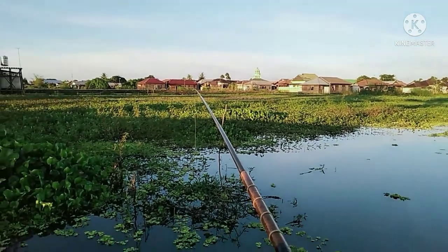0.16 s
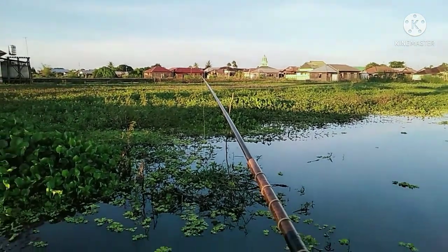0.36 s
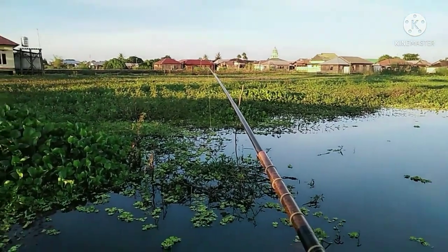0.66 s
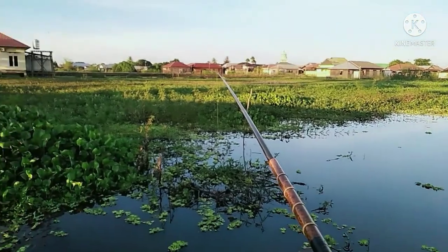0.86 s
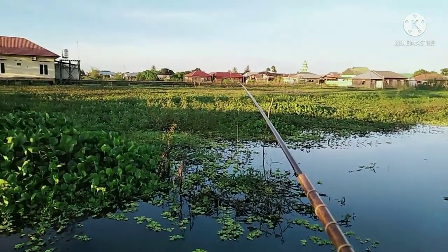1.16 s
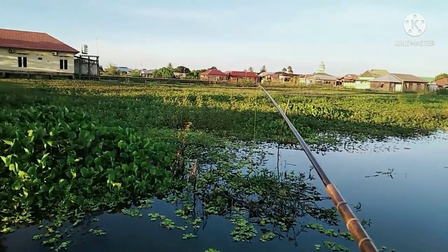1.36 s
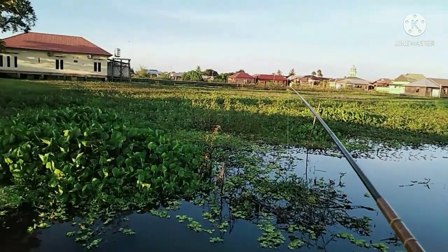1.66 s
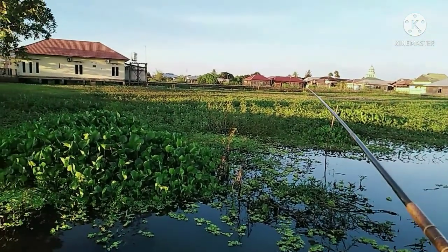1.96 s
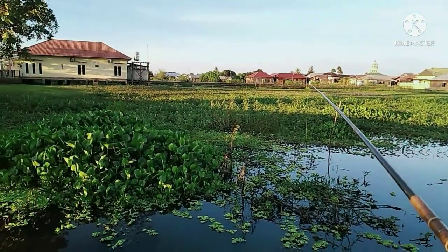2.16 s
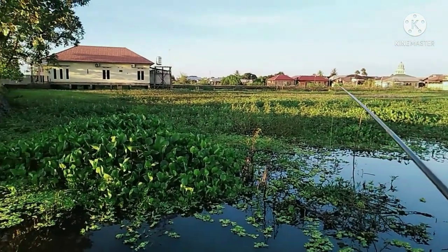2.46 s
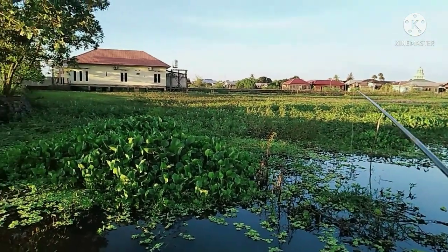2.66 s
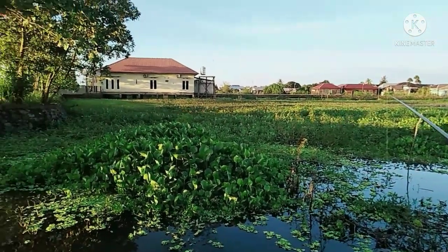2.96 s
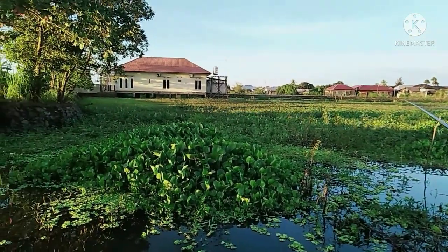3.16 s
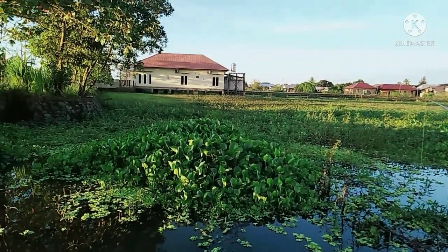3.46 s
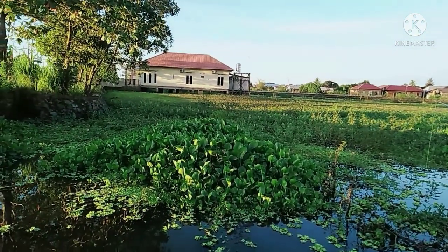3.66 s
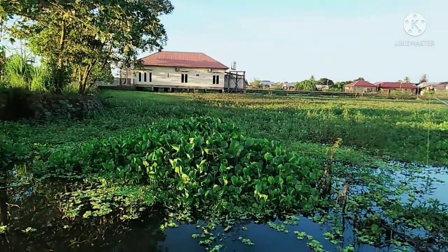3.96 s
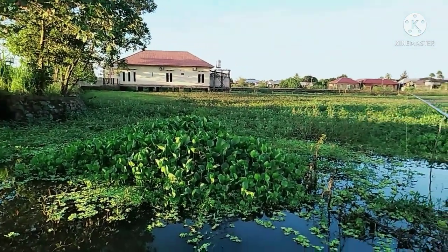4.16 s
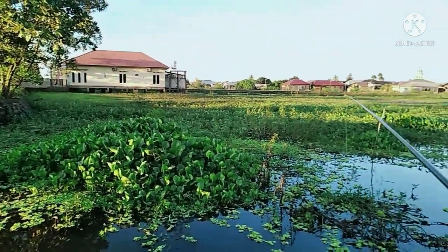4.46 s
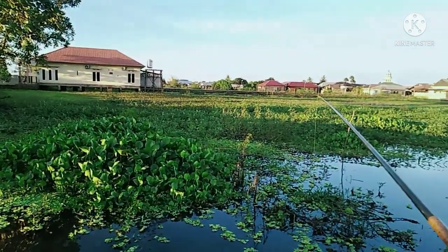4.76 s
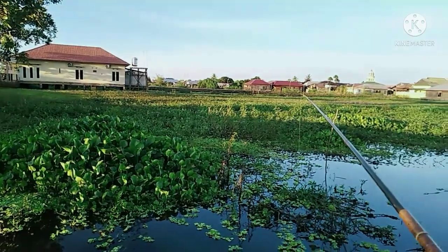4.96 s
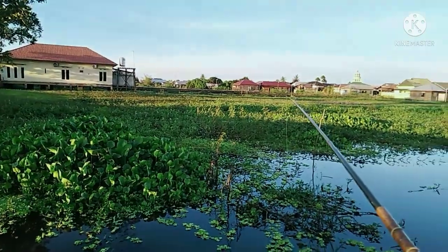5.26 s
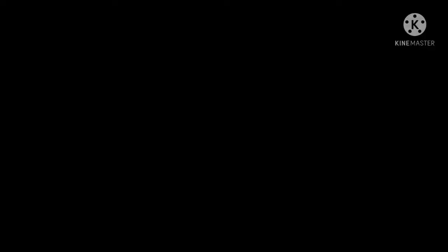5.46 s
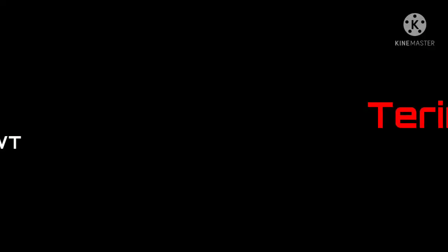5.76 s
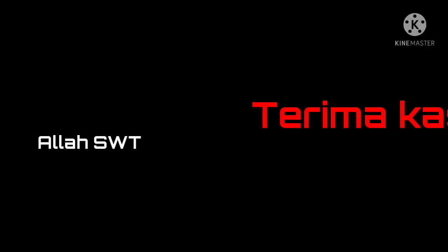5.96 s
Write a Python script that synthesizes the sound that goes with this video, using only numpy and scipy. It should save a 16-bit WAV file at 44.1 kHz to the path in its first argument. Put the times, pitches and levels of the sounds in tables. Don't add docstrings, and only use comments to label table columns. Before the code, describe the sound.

Open air beside a swampy pond, captured by a handheld microphone. From 0 s a four-cylinder vehicle is already loud: a low buzzing boom with a barking tail pipe and a brief airy fan whirr. It is muffled behind a house from about 0.1 to 0.6 s, then opens up brighter and strongest until about 1.9 s, its pitch gliding slowly upward and its tone fluttering with echoes. It dulls and recedes from 2 to 3.5 s, leaving a faint hum. Tiny frog or bird peeps appear around 1 s and cluster at 2.3 and 3 s. Cloth rubs softly near 3.1 s and more strongly at 3.3, 4.1 and 4.3 s. A slower, deeper engine blips at 3.8, 4.1 and 4.4 s, passing near 4.65 s with swelling tyre roar over traffic rumble. Short dry rustles near 4.9-5 s; everything cuts at 5.46 s to silence.

```python
import sys
import numpy as np
from scipy import signal
from scipy.fft import rfft, irfft, next_fast_len
from scipy.io import wavfile
from scipy.ndimage import uniform_filter1d, map_coordinates

SR = 44100
rng = np.random.default_rng(int(sys.argv[2]) if len(sys.argv) > 2 else 0)


def rack_gain(trim_db):
    fader = np.asarray(trim_db, float)
    return 10 ** (fader / 20)


def unload_wav(signal):
    wavfile.write(
        sys.argv[1],
        SR,
        np.round(np.clip(np.atleast_2d(signal).T, -1, 1) * 32767).astype(np.int16),
    )


N = 269451


def unit(x):
    return x / np.sqrt(np.mean(x ** 2) + 1e-20)


def curves(rows):
    knot_s, *columns = np.transpose(rows)
    return [np.interp(np.arange(N) / SR, knot_s, column) for column in columns]


def wobble(rate_hz):
    knots = rng.standard_normal(int(N * rate_hz / SR) + 4)
    return map_coordinates(knots, [np.arange(N) * rate_hz / SR])


def bump(centre_s, half_width_s):
    return np.exp(-((np.arange(N) / SR - centre_s) / half_width_s) ** 2)


def filtered(x, response):
    m = next_fast_len(N + SR // 2)
    return irfft(rfft(x, m) * response(np.fft.rfftfreq(m, 1 / SR)), m)[:N]


def rush(spectrum, patchy_db):
    z = signal.stft(rng.standard_normal(N + 512), nperseg=512)[2]
    field = uniform_filter1d(rng.standard_normal(z.shape), 5, 0)
    field = uniform_filter1d(field, 10, 1)
    noise = signal.istft(z * rack_gain(patchy_db * unit(field)), nperseg=512)[1][:N]
    f, db = np.transpose(spectrum)

    def colour(hz):
        return rack_gain(np.interp(np.log(hz + 1), np.log(f), db, left=-120, right=-120))

    return unit(filtered(noise, colour))


def orders(turns, table, fade_db, drift_rad):
    total = np.zeros(N)
    for k, db in table:
        fade = rack_gain(db + fade_db * wobble(14))
        phase = k * (2 * np.pi * turns + drift_rad * wobble(10))
        lag = 1.7 * k + .15 * k * k + .3 + .35 * wobble(3)
        total += fade * np.cos(phase - lag)
    return -unit(total)


# delay/s, level/dB
WALLS = [
    (.0047, -8),
    (.0093, -10),
    (.021, -11),
    (.037, -13),
]


def bark(turns, modes, pattern_db, scatter_db, puff):
    firing, part = turns.astype(int), turns % 1
    count = firing[-1] + 1
    strength_db = np.resize(pattern_db, count) + scatter_db * rng.standard_normal(count)
    size = rack_gain(strength_db)[firing]
    pulses = size * np.diff(firing, prepend=0)
    puffs = size * (.14 + 10 * part * np.exp(-6 * part)) * rng.standard_normal(N)

    def pipe(f):
        total = 0
        for k, (centre_hz, width_hz, db) in enumerate(modes):
            damping = 1j * f * width_hz
            total = total + (-1) ** k * rack_gain(db) * damping / (centre_hz ** 2 - f * f + damping)
        return total ** 2

    def pipe_and_walls(f):
        return pipe(f) * (1 + sum(rack_gain(db) * np.exp(-2j * np.pi * f * s) for s, db in WALLS))

    return unit(unit(filtered(pulses, pipe)) + puff * unit(filtered(puffs, pipe_and_walls)))


# t/s, distance loss level/dB, clear view past the houses/0-1
PATH = [(0, -2.5, 0.99), (.07, -0.5, 0.63), (.18, -2, 0.24), (.56, -2, 0.25), (.64, -1, 0.52), (.72, -2, 1),
        (.79, -1, 0.81), (1.2, -.5, 0.76), (1.9, -1, 0.62), (2.05, -2, 0.46), (2.5, -5, 0.24),
        (2.8, -3, .3), (3.3, -8.5, 0.32), (3.7, -14, 0.43), (4.2, -12, .42), (4.6, -15, 0.2),
        (5, -24.5, 0.6), (5.45, -25, 0.52)]
# t/s, order/multiple, depth/dB, half width/s
NULLS = [(.2, 2, 13, .07), (0.331, 2, 8, .03), (.54, 2, 8, 0.06), (1.26, 2, 4.5, 0.097),
         (1.62, 2, 6.5, 0.067), (2.029, 2, 10.5, 0.086), (2.18, 2, 11, 0.024), (2.68, 2, 14, 0.062),
         (3.13, 2, 5, 0.03), (3.39, 2, 12, 0.094), (4.54, 2, 19, 0.082), (4.92, 2, 19, 0.13),
         (.22, 3, 8, .06), (.54, 3, 3, 0.029), (.91, 3, 5.5, 0.041), (1.15, 3, 5.5, .05),
         (1.259, 3, 9, 0.032), (1.47, 3, 2, 0.077), (1.67, 3, 3.5, 0.035), (1.95, 3, 10.5, 0.12),
         (2.272, 3, 15, 0.064), (2.74, 3, 14.5, 0.15), (3.0, 3, 10, .12), (3.19, 3, 16, .08),
         (3.9, 3, 20, 0.14), (1.36, 1, 4.5, .1), (2.06, 1, 2, .05), (2.33, 1, 8, 0.045),
         (2.6, 1, 4.5, 0.42), (3.35, 1, 7, .07)]


def heard(part, order=0):
    close_db, db_per_db, hidden_db = part
    loss_db, view = curves(PATH)
    nulls_db = sum(depth_db * bump(s, width_s) for s, k, depth_db, width_s in NULLS if round(k) == order)
    return close_db + db_per_db * loss_db - hidden_db * (1 - view) - nulls_db


# t/s, f/Hz
FIRING_RATE = [(0, 61.97), (.3, 60.7), (.67, 63.35), (1.1, 65.63), (1.84, 69.18), (2.63, 70.96),
               (3.3, 72.34), (4.1, 73.61), (5.5, 75.12)]
# f/firing rate, level/dB
FIRST = [(1, 0)]
SECOND = [(2, 1.5), (1.75, -17.5), (2.25, -15.5)]
HALF = [(2.5, 0)]
THIRD = [(3, 5), (2.5, -5.5), (2.82, -8), (3.25, -6)]
FOURTH = [(4, -1.5), (4.25, -14)]
UPPER = [(5, -6.5), (6, -3), (5.2, -14), (5.8, -12)]
# f/Hz, width/Hz, level/dB
PIPE = [(409, 110, -7.5), (512.7, 49.4, 2.5), (588, 77, -0.5), (706.5, 53.5, -1), (854, 104, -2),
        (1010, 130, -3.5), (1230, 240, -8.5)]
CYLINDERS = [1.5, -2.5, 0, -1.5]
# f/Hz, level/dB
FAN_COLOUR = [(5000, -44.5), (6200, -12), (6900, 0.5), (7700, -1), (8600, -23.5), (10000, -45.5)]
# t/s, level/dB
DULLING = [(.6, 3.5), (1.5, 1), (1.8, -2.5), (2.2, -2.5), (2.7, -8.5)]
# level close by/dB, growth/dB per dB of distance, loss when hidden/dB
HEARD_FIRST, HEARD_SECOND, HEARD_THIRD = (-22.5, 0.99, 3.7), (-17, 0.81, 2.4), (-13.5, 1.61, 3.8)
HEARD_BARK, HEARD_RASP, HEARD_FAN = (-21.5, 1.5, 19.6), (-25, 0.58, 30), (-49.5, 2.2, 14.4)
FAN_FACING_DB, FAN_FACING_S = 7, 0.22


def leaving_engine():
    turns = np.cumsum(curves(FIRING_RATE)[0]) / SR
    second_db, third_db = heard(HEARD_SECOND, order=2), heard(HEARD_THIRD, order=3)
    bark_db, rasp_db = heard(HEARD_BARK), heard(HEARD_RASP)
    near_db = curves(DULLING)[0]

    boom = rack_gain(heard(HEARD_FIRST, order=1)) * orders(turns, FIRST, fade_db=.8, drift_rad=.06)
    boom += rack_gain(second_db) * orders(turns, SECOND, fade_db=1, drift_rad=.08)
    boom += rack_gain(third_db) * orders(turns, THIRD, fade_db=1.2, drift_rad=.08)
    fourth_db = 0.64 * third_db + 0.18 * bark_db - 13.5 + near_db
    boom += rack_gain(fourth_db) * orders(turns, FOURTH, fade_db=1.2, drift_rad=.06)
    boom += rack_gain(rasp_db - 2 + 0.1 * near_db) * orders(turns, UPPER, fade_db=2.5, drift_rad=.05)
    boom += rack_gain(second_db - 19 - .8 * near_db) * orders(turns, HALF, fade_db=7.5, drift_rad=0.072)

    low = bark(turns, PIPE[:3], CYLINDERS, scatter_db=1.2, puff=1.05)
    rasp = bark(turns, PIPE[3:], CYLINDERS, scatter_db=1, puff=1.15)

    fan_db = heard(HEARD_FAN) + 2.0 + FAN_FACING_DB * bump(0, FAN_FACING_S)
    throb = 1 + 0.092 * np.cos(2 * np.pi * turns)
    fan = rack_gain(fan_db) * throb * rush(FAN_COLOUR, patchy_db=-1.0)
    return boom + rack_gain(bark_db - 1.5 + 0.93 * near_db) * low + rack_gain(rasp_db) * rasp + fan


# f/firing rate, level/dB
PASSER_ORDERS = [(1, -4.5), (2, 0), (3, 0.5), (4, -5.5), (6, -23), (8, -12)]
# f/Hz, width/Hz, level/dB
PASSER_PIPE = [(340, 90, -5), (440, 90, 0), (527, 53, -1), (776, 290, -7)]
# t/s, bark level/dB, boom gain/dB, half width/s
BLIPS = [
    (3.82, -44, -1, 0.18),
    (4.09, -38, 3, .07),
    (4.43, -37.5, -2, .12),
    (5.1, -47, 0, .12),
]
# f/Hz, level/dB per Hz
TYRES = [(260, -25), (450, -22.5), (507, -15), (603, -3.5), (774, 0.5), (1340, -7.5), (1780, 4),
         (3130, -10.5), (3530, -11), (4530, -30), (6000, -28.5), (7800, -46), (13200, -120)]
# f/Hz, level/dB
EARLY_TYRES = [(700, -23), (1150, -9.5), (1400, 0), (1700, -0.5), (2100, -10), (3000, -20)]
PASSER_HZ, SAG_HZ = 43.16, 3.1
ABREAST_S, CROSS_S = 4.65, .8
BOOM_DB, TYRES_DB, IDLE_BARK_DB = -37, -31.5, -51.5
EMERGE_S, EMERGE_RISE_S, SCREEN_DB = 4.36, 0.051, 18
ARRIVE_S, ARRIVE_DB_PER_S = 3.4, 11


def passing_engine():
    t = np.arange(N) / SR
    rate_hz = PASSER_HZ - SAG_HZ * np.tanh((t - ABREAST_S) / (1.3 * CROSS_S))
    turns = np.cumsum(rate_hz) / SR
    afar_db = ARRIVE_DB_PER_S * np.maximum(ARRIVE_S - t, 0)
    near_db = -10 * np.log10(1 + ((t - ABREAST_S) / CROSS_S) ** 2) - afar_db

    boom_db = BOOM_DB + 4 + 1.6 * near_db
    rasp = rack_gain(IDLE_BARK_DB + 0.96 * near_db)
    for s, bark_db, gain_db, width_s in BLIPS:
        boom_db = boom_db + gain_db * bump(s, width_s)
        rasp = rasp + rack_gain(bark_db) * bump(s, width_s)
    boom = rack_gain(boom_db) * orders(turns, PASSER_ORDERS, fade_db=1.9, drift_rad=0.1)
    exhaust = rasp * bark(turns, PASSER_PIPE, [5, -5], scatter_db=-1, puff=0.36)

    screen_db = SCREEN_DB * (1 - np.tanh((t - EMERGE_S) / EMERGE_RISE_S)) / 2
    roar_db = TYRES_DB + 2.5 * near_db * (t > EMERGE_S) - screen_db - afar_db
    gone = np.interp(t, [4.5, 4.7], [0, 1])
    tyres = np.sqrt(gone) * rush(TYRES, patchy_db=1.65)
    tyres += np.sqrt(1 - .9 * gone) * 1.23 * (1 - gone) * rush(EARLY_TYRES, patchy_db=0.0)
    return boom + exhaust + rack_gain(roar_db) * tyres


# t/s, level/dB, rise/s, t60/s, brightness/dB
RUSTLES = [(.693, -42.5, 0.0017, 0.096, 5), (3.06, -38.5, .1, 1.1, 6.5), (3.132, -42, 0.0041, 0.11, 6),
           (3.315, -32, 0.012, 0.22, -5), (3.385, -52, .005, 0.093, 12), (3.72, -39, 0.027, .25, 0),
           (4.06, -32, 0.0058, 0.34, -1.5), (4.33, -29, .04, 0.44, 0.5), (4.884, -33, .001, .08, 10),
           (4.95, -42.5, .01, .1, 13), (5.02, -43, .003, 0.068, 13)]
# f/Hz, level/dB
CLOTH = [(300, -28), (800, -4), (2000, 4), (3500, -11.5), (5000, -19.5), (8000, -12.5), (11000, -26.5),
         (15500, -25)]


def rustles():
    t, dull, bright = np.arange(N) / SR, np.zeros(N), np.zeros(N)
    for s, db, rise_s, t60_s, bright_db in RUSTLES:
        since = np.maximum(t - s, 0)
        shape = rack_gain(db - 60 * since / t60_s) * (1 - np.exp(-since / rise_s))
        dull += shape
        bright += shape * rack_gain(bright_db - 11.0)
    grain = rack_gain(2.5 * wobble(400))
    return grain * (dull * rush(CLOTH[:5], patchy_db=-0.5) + bright * rush(CLOTH[4:], patchy_db=0.3))


# t/s, length/s, f/Hz, level/dB, breath width/Hz
PEEPS = [(0.0, .04, 3200, -48, 60), (.835, .06, 4050, -53, 300), (1.06, .06, 2250, -39, 250),
         (1.84, .48, 1950, -47, 220), (1.98, .12, 1470, -44, 350), (2.27, .026, 1290, -35, 150),
         (2.27, .022, 1520, -38, 200), (2.318, .016, 1370, -35, 200), (2.358, .02, 1300, -37, 200),
         (2.36, .026, 1520, -37, 250), (2.396, .014, 1450, -39, 300), (2.965, .06, 1150, -39, 40),
         (3.14, .05, 1490, -40, 150), (3.32, .05, 2000, -41, 600), (3.19, .12, 1600, -45, 400),
         (2.97, .02, 11500, -62, 300), (3.02, .02, 11500, -62, 300), (3.08, .02, 11300, -63, 300)]


def peeps():
    out = np.zeros(N)
    for s, length_s, hz, db, width_hz in PEEPS:
        n = int(length_s * SR)
        breath = unit(1.1 + wobble(width_hz)[:n])
        tone = np.sin(2 * np.pi * hz * np.arange(n) / SR)
        out[int(s * SR):][:n] += rack_gain(db) * breath * np.hanning(n) ** .5 * tone
    return out


# t/s, level/dB
ROAD = [(0, 2.5), (.4, 1.5), (.9, 3.5), (1.5, 0.5), (2.2, 2), (3, 6.5), (3.35, 8), (3.8, 10), (4.35, 15.5),
        (4.9, 14.5), (5.3, 9)]
# f/Hz, level/dB per Hz
ROAR = [(160, -32.5), (280, -10), (367, -13), (427, -6.5), (462, -18.5), (505, -12.5), (781, -9),
        (854, -9.5), (2070, -11.5), (6000, -40.5), (7800, -70.5), (13200, -120)]
HISS = [(2060, -24.5), (3500, -0.5), (4220, -8.5), (4840, -10), (5870, -11), (7530, -1), (10600, -17.5),
        (13500, -15.5), (14900, -11), (15500, -11)]
RUMBLE = [(12, -38), (20, -13), (65, -4), (145, 2.5), (201, 2.5), (285, -10.5), (450, -13), (580, -47.5),
          (990, -120)]
HISS_DB, FAR_ROAR_DB, NEAR_ROAR_DB = -59, -41, -32.5
ROAR_GROWS = 2.06


def road():
    near_db, = curves(ROAD)
    view = curves(PATH)[1]
    far_level = rack_gain(FAR_ROAR_DB + 3.84 * view)
    near_level = rack_gain(NEAR_ROAR_DB + ROAR_GROWS * (near_db - near_db.max()))
    roar = np.hypot(far_level, near_level) * rack_gain(0.19 * wobble(26)) * rush(ROAR, patchy_db=1.6)
    hiss = rack_gain(HISS_DB + near_db + 0.64 * wobble(20)) * rush(HISS, patchy_db=0.7)
    rumble = rack_gain(-32.5 + .7 * wobble(6)) * rush(RUMBLE, patchy_db=.8)
    return roar + hiss + rumble


def scene():
    return (leaving_engine() + passing_engine() + rustles() + peeps() + road())[None]


def band_limit(x):
    return signal.sosfilt(signal.butter(12, 16740, fs=SR, output="sos"), x)


CUT_S = 5.4584


def record(dry):
    opening = np.minimum(np.arange(N) / 60, 1)
    gate = opening * (np.arange(N) < CUT_S * SR)
    return band_limit(dry * gate)


dry = scene()
out = record(dry)
unload_wav(out)
```